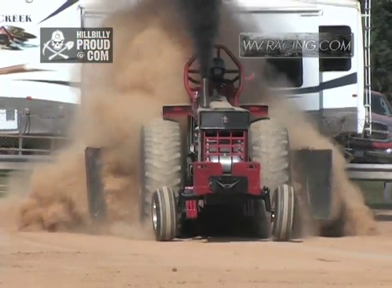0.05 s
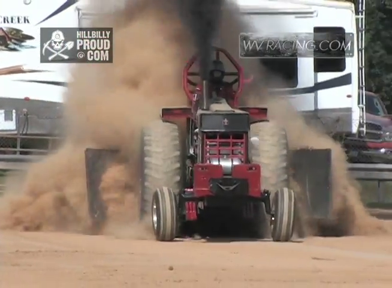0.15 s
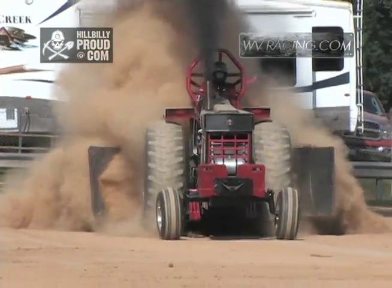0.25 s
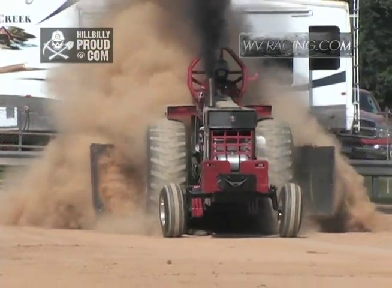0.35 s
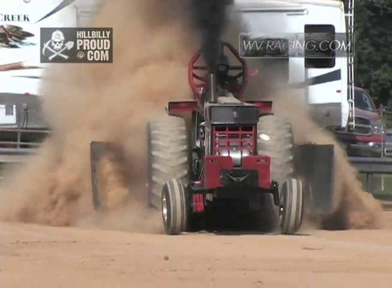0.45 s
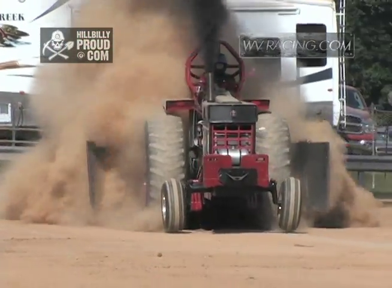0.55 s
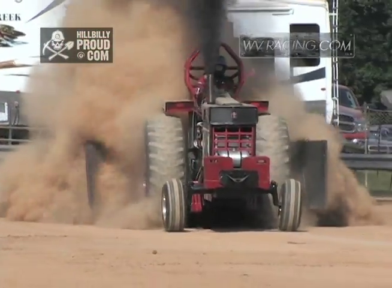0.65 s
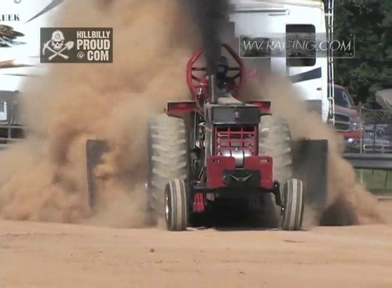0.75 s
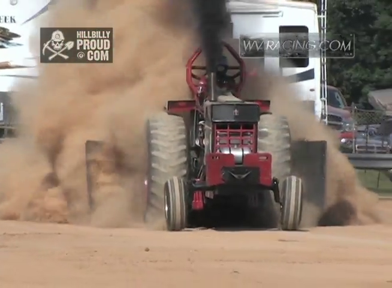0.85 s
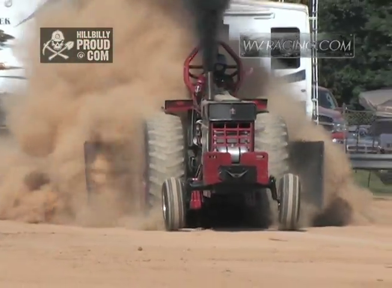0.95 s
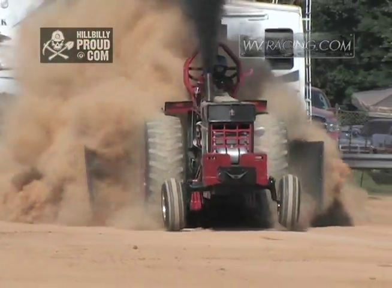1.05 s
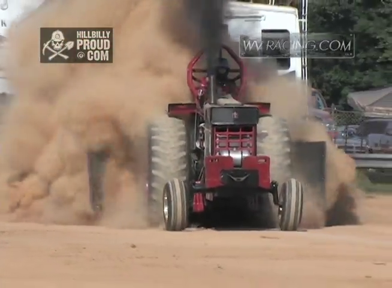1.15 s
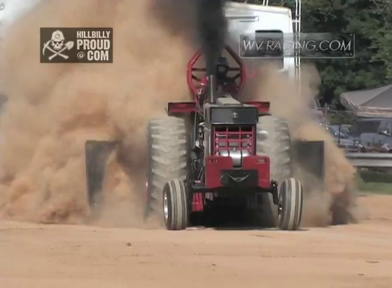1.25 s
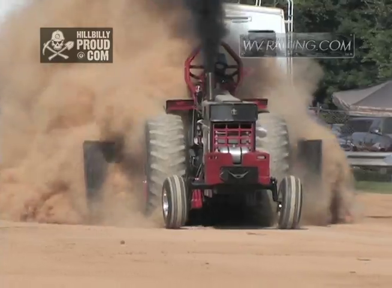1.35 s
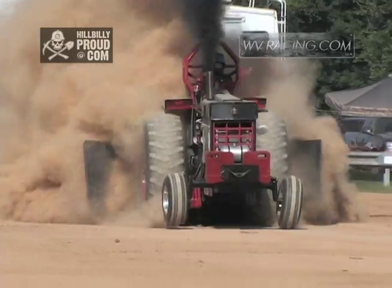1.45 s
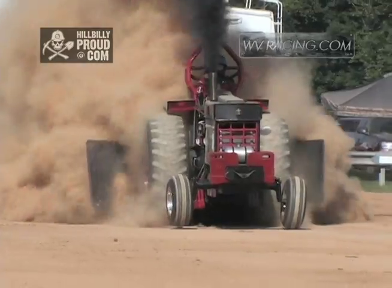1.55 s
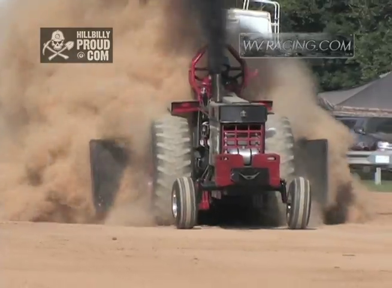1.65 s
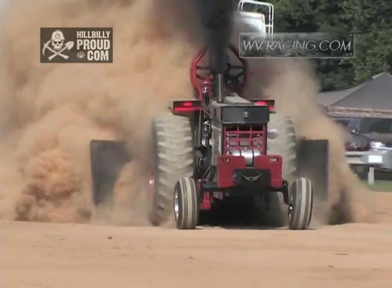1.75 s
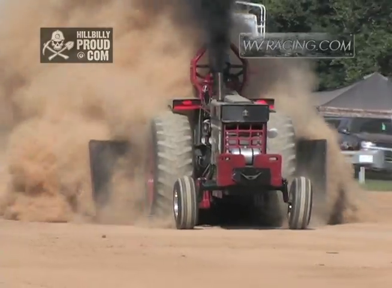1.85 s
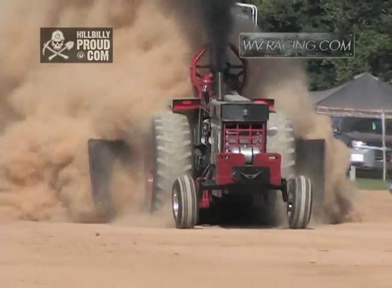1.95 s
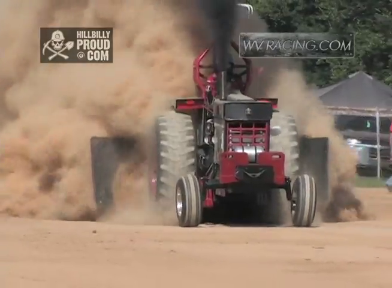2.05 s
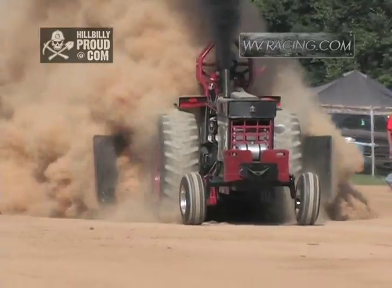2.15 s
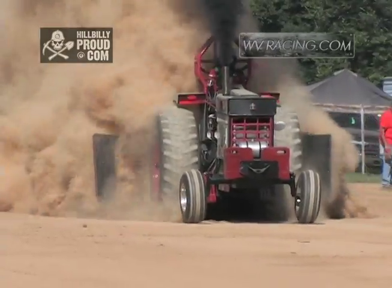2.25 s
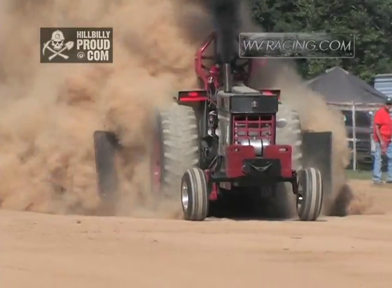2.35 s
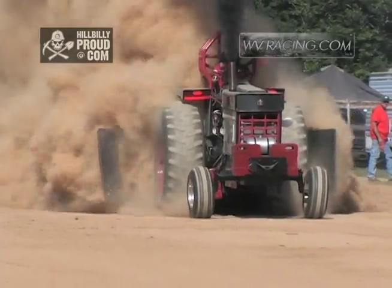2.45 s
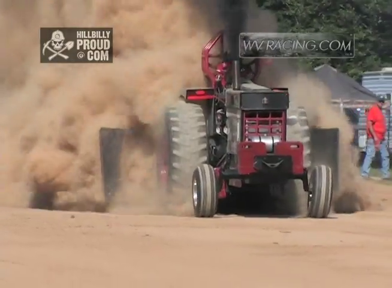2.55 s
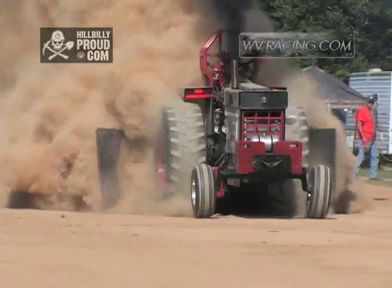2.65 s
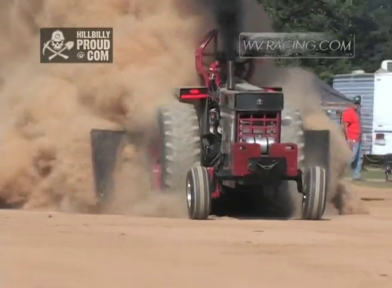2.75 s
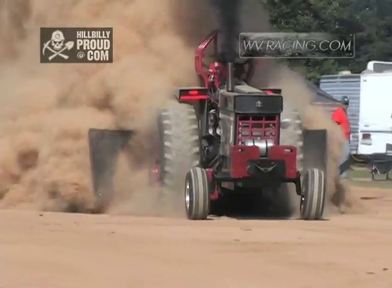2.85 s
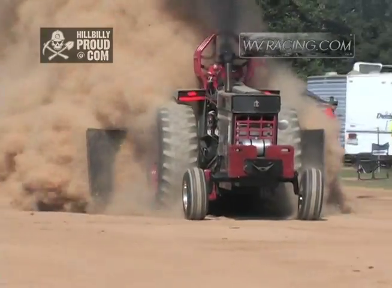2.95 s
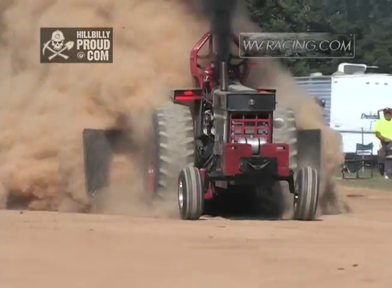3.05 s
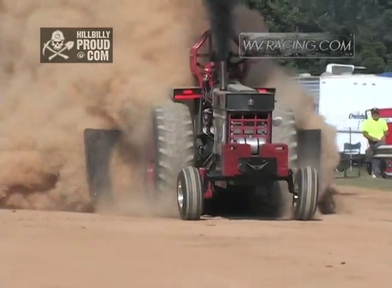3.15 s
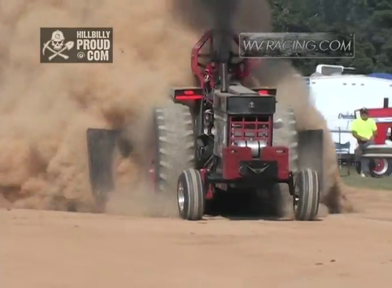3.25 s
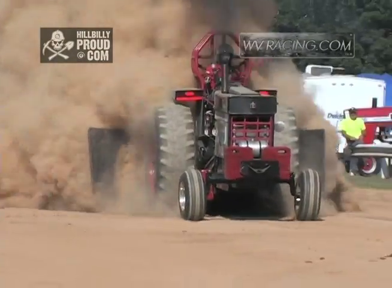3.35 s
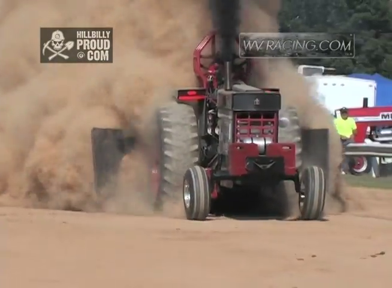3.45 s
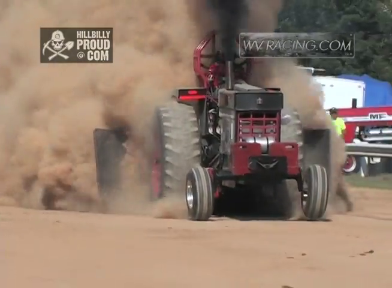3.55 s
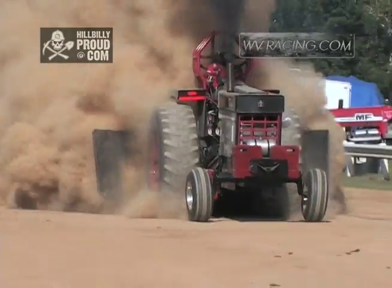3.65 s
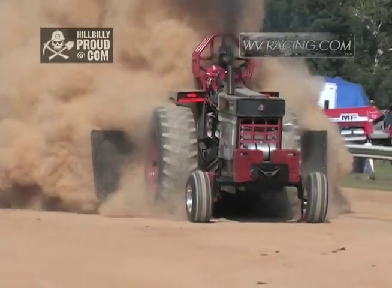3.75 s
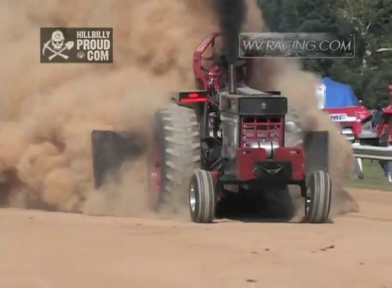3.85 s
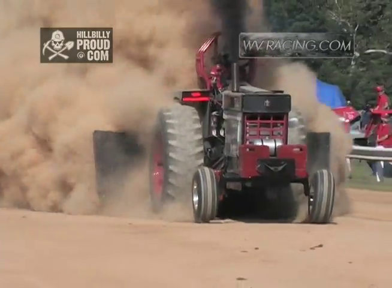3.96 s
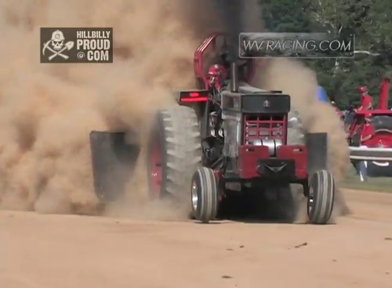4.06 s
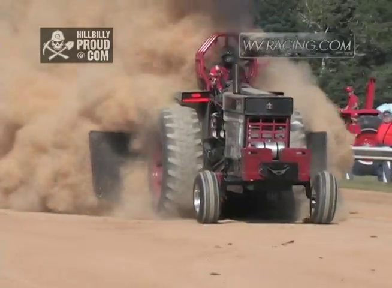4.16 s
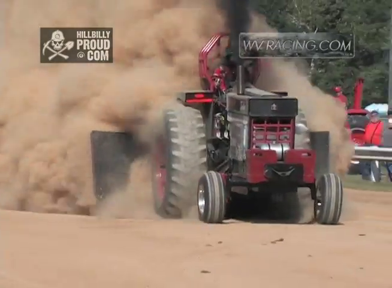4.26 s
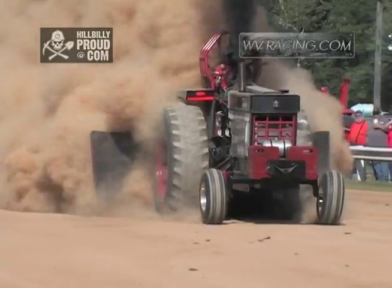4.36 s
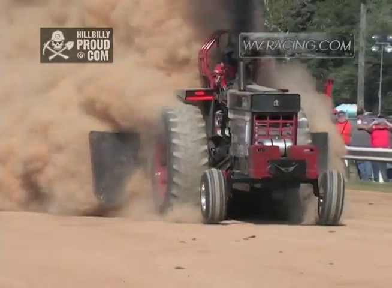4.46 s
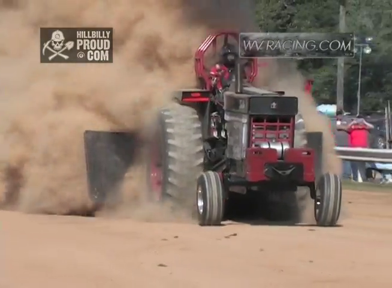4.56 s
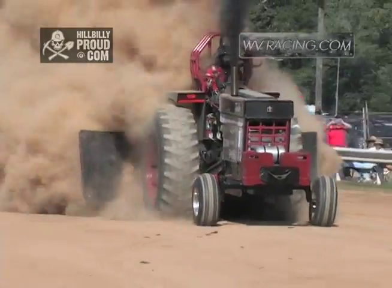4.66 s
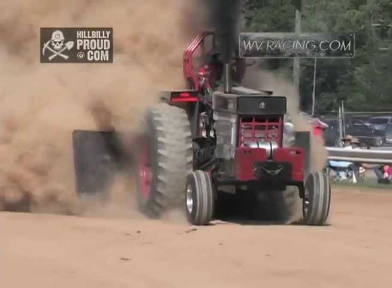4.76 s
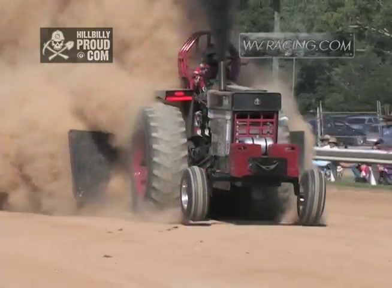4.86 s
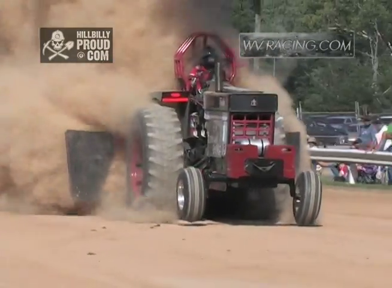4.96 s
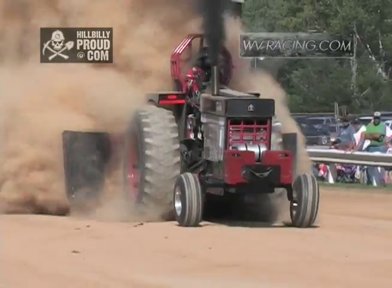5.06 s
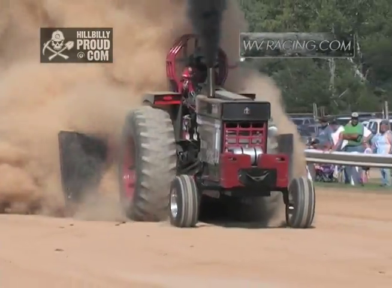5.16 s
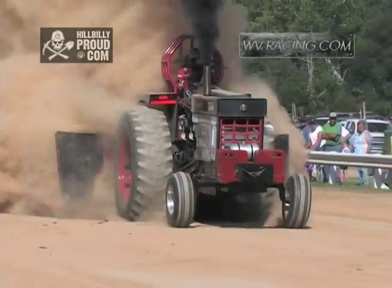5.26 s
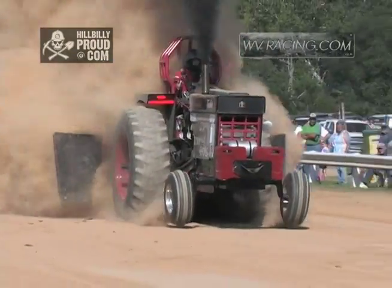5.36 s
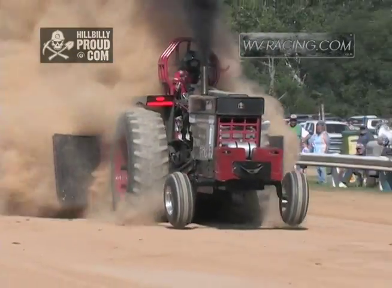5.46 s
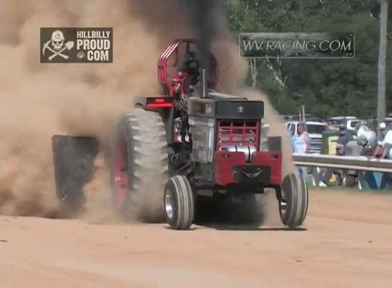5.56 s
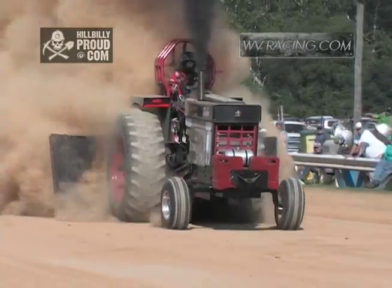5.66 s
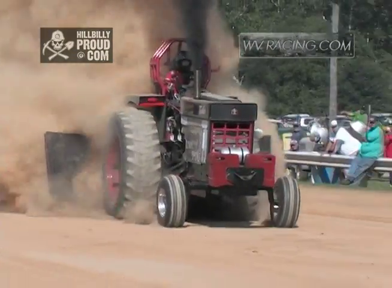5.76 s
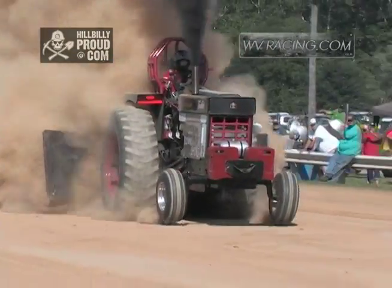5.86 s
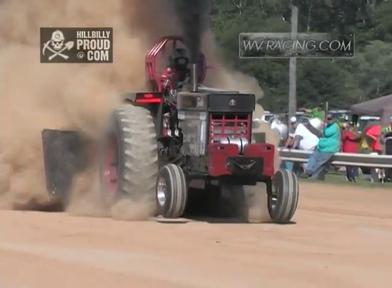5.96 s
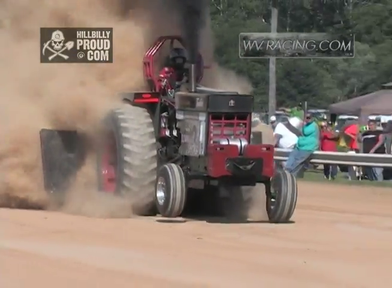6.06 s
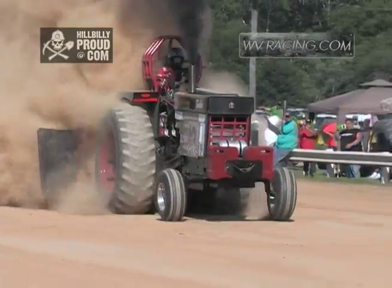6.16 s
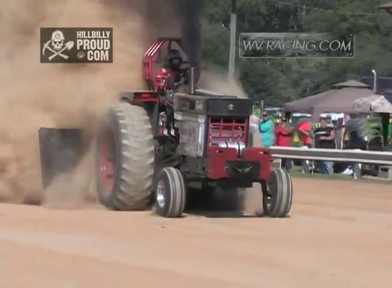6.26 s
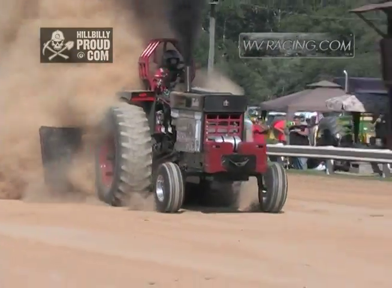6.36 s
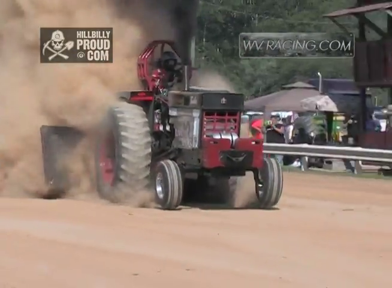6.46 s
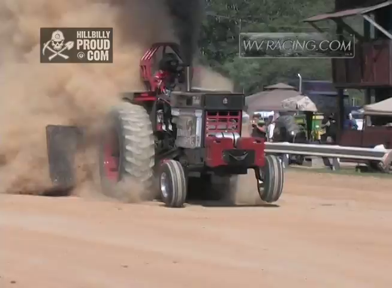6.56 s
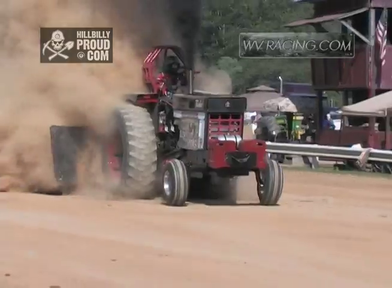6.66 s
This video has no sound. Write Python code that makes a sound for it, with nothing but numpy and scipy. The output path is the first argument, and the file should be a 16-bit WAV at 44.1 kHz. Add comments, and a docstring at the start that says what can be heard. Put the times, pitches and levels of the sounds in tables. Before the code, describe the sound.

A turbocharged diesel tractor is pulling at full throttle from the start, outdoors, heading toward the microphone. Its deep, booming drone carries a knocking rattle and a rushing exhaust hiss, with a faint rumble of sled and tyres underneath. For the first 3 seconds the revs swing up and down about twice a second, and a very high, thin turbo whistle wavers faintly with them. From about 3.1 to 5.2 seconds the engine falters briefly six times, roughly every 0.4 seconds. Each time the roar dips and the whistle drops in pitch, then both recover, mostly with a small rising chirp. The sound grows louder throughout as the tractor nears, with the hiss and whistle much stronger from around 4 seconds. After 5.3 seconds the revs hold steadier, and the engine roars at its loudest until the end at about 6.7 seconds.

```python
"""A boosted six-cylinder diesel tractor hauls a sled closer, in mono; its speed hunts and the fuel
cuts briefly six times. The stack booms a near-pure firing tone, gas roars out once a firing and
echoes off the track, and unequal cylinders knock in the block. The turbo's blades whistle near the
top of hearing and slow at each cut; a chirp marks the fuel's return. Sled and tyres rumble below."""
import sys
import numpy as np
from scipy import signal
from scipy.fft import rfft, irfft
from scipy.io import wavfile
from scipy.ndimage import uniform_filter1d, map_coordinates

SR = 44100
rng = np.random.default_rng(int(sys.argv[2]) if len(sys.argv) > 2 else 0)


def bounce(signal):
    """Save signal as a 16-bit WAV file at the path given by the first command-line argument."""
    frames = np.transpose(np.atleast_2d(signal))
    limited = np.clip(frames, -1, 1)
    pcm = np.round(limited * 32767).astype(np.int16)
    wavfile.write(sys.argv[1], SR, pcm)


N = 295911
T = np.arange(N) / SR
CRUISE_HZ = 140  # firing rate


def undb(db):
    return 10 ** (np.asarray(db) / 20)


def unit(x):
    return x / np.sqrt(np.mean(x ** 2))


def steady(x):
    """Hold the running RMS at 1, keeping the puffs."""
    return x / np.sqrt(uniform_filter1d(x ** 2, size=9000))


def curves(table):
    """Columns of a time table, one value a sample."""
    times_s, *columns = np.transpose(table)
    return [np.interp(T, times_s, column) for column in columns]


def colour(x, points):
    """Filter by (Hz, dB) points."""
    hz, db = np.transpose(points)
    log_hz = np.log(np.arange(N // 2 + 1) * SR / N + 1)
    return irfft(rfft(x) * undb(np.interp(log_hz, np.log(hz), db, left=-90, right=-90)), N)


def ring(x, hz, width_hz):
    """One resonance."""
    return signal.lfilter(*signal.iirpeak(hz, hz / width_hz, SR), x)


def walk(rate_hz):
    """Random steps, smoothed twice; RMS 1."""
    hold = int(SR / rate_hz)
    steps = np.repeat(rng.standard_normal(N // hold + 1), hold)
    return unit(uniform_filter1d(uniform_filter1d(steps, hold), hold)[:N])


# Turning points of engine speed. Each row: time in seconds, firing rate in Hz.
SPEED_HUNT = [(0.04, 145.6), (0.252, 117.7), (0.501, 146), (0.707, 124.2), (0.96, 145.8), (1.179, 122.6),
              (1.397, 146.3), (1.621, 122.5), (1.856, 143.7), (2.063, 127.1), (2.283, 143.1),
              (2.502, 130.4), (2.715, 143.2), (2.927, 131.5), (3.141, 148.8), (3.323, 134.9),
              (3.523, 149.5), (3.702, 135.6), (3.908, 148.9), (4.087, 137.7), (4.313, 147.8),
              (4.532, 137.4), (4.726, 151.6), (4.868, 138.8), (4.998, 139.9), (5.147, 153.1),
              (5.265, 135.7), (5.53, 143.0), (5.69, 141.9), (6.067, 138.1), (6.283, 142.1), (6.56, 133.5),
              (6.669, 136.2)]

def firing_hz(late_s=0):
    """The speed hunts, easing from one turning point to the next."""
    times_s, hz = np.transpose(SPEED_HUNT)
    rows = np.arange(len(times_s))
    position = np.interp(T - late_s, times_s, rows)
    eased = np.floor(position) + np.sin(np.pi / 2 * (position % 1)) ** 2
    return np.interp(eased, rows, hz)


# Fuel cuts. Each row: start in seconds, length in seconds, blade tone loss in Hz before respooling,
# boom dip in dB, roar dip in dB, knock dip in dB, chirp level in dB.
FUEL_CUTS = [(3.144, 0.13, 557, 3, 3.5, 0, -56), (3.511, 0.14, 1450, 5.5, 9, 7, -44),
             (3.887, 0.15, 1350, 7, 7, 6.5, -37), (4.286, 0.16, 1201, 4, 5, 4.5, -36.5),
             (4.707, .15, 1620, 8, 8, 10, -36), (5.137, 0.099, 1350, 12, 9.5, 7.5, -45)]

def fuel_cuts(depths, late_s=0, skew=1, power=2):
    """One smooth bump a cut, each with its own depth; skew above 1 peaks later."""
    bumps = np.zeros(N)
    for (start_s, length_s, *_), depth in zip(FUEL_CUTS, depths):
        progress = np.clip((T - start_s - late_s) / length_s, 0, 1)
        bumps += depth * np.abs(np.sin(np.pi * progress ** skew)) ** power
    return bumps


def blade_loss_hz(spool_s=0.1726):
    """The turbo slows while the fuel is cut, then spools up again."""
    _, length_s, loss_hz, *_ = np.transpose(FUEL_CUTS)
    return signal.lfilter([2 / SR], [1, -np.exp(-1 / (spool_s * SR))], fuel_cuts(loss_hz / length_s))


def puffs(firings, lag_firings, depth_db, cylinder_db, scatter_db):
    """Gain that swells once a firing, sized by cylinder and by chance."""
    firings = firings - lag_firings
    index = np.floor(firings).astype(int)
    size_db = cylinder_db[index % 6] + scatter_db * rng.standard_normal(N // 100)[index]
    return undb(uniform_filter1d(size_db, size=80) - depth_db * np.cos(2 * np.pi * firings))


# Rumble spectrum. Each row: frequency in Hz, relative density in dB.
RUMBLE_SPECTRUM = [(25, -27), (45, -16), (58, -8), (68, -1.5), (80, -12), (100, -3.5), (170, 3),
                   (250, -4.5), (350, -3.5), (480, -6)]

def ground_rumble(hum_hz=58.7):
    """Sled and tyres rumble over a wavering hum."""
    rumble = unit(colour(rng.standard_normal(N), RUMBLE_SPECTRUM))
    rumble *= undb(-39 + 0.21 * T + 2.1 * walk(4.812))
    hum = undb(-53 + 2.7 * walk(8.9)) * np.sin(2 * np.pi * hum_hz * T)
    return rumble + hum


def fuel_chirps(from_hz=3150, to_hz=3660, glide_s=0.068):
    """Narrow noise glides up as the fuel returns."""
    slow_noise = unit(colour(rng.standard_normal(N), [(1, -4), (120, 2), (260, -28)]))
    glides = np.zeros(N)
    for start_s, length_s, *_, db in FUEL_CUTS:
        progress = np.clip((T - start_s - 0.75 * length_s) / glide_s, 0, 1)
        hz = from_hz + (to_hz - from_hz) * progress
        envelope = undb(db) * 2 * np.sin(np.pi * progress ** 0.64)
        glides += envelope * np.sin(2 * np.pi * np.cumsum(hz) / SR)
    return glides * slow_noise


# Blade tone at cruise speed and full boost. Each row: time in seconds, frequency in Hz.
BLADE_PITCH = [(0, 12480), (.5, 12435), (1.5, 12500), (2, 12678), (2.5, 12754), (3, 12757), (3.6, 12595),
               (4.2, 12512), (4.8, 12533), (5.4, 12393), (5.7, 12587), (6, 12585), (6.33, 12750),
               (6.71, 12752)]
# Whistle at full boost. Each row: time in seconds, level in dB.
BLADE_LEVEL = [(0, -66), (.1, -60), (.28, -50), (.5, -59), (.7, -51), (.9, -59), (1.18, -49.5), (1.7, -54),
               (1.87, -62), (2.08, -53), (2.2, -59), (2.35, -51), (2.56, -61), (2.68, -42), (2.95, -43),
               (3.15, -43), (3.55, -47), (3.9, -40), (4.05, -43), (4.25, -32), (4.48, -44), (4.6, -36),
               (4.82, -37.5), (5, -39), (5.12, -34), (5.3, -35.5), (5.55, -45), (5.85, -30), (6.12, -39),
               (6.33, -35), (6.55, -43), (6.71, -37)]
# Neighbouring tones. Each row: frequency ratio to the blade tone, relative level in dB.
BLADE_SIDEBANDS = [(.9725, -16), (.9885, -18), (.995, -17), (1.005, -19), (1.0115, -19), (1.0275, -23)]

def turbo_whistle(loss_hz, lag_s=0.0144):
    """The blade tone and its neighbours follow engine speed and shimmer through hot air."""
    hz = curves(BLADE_PITCH)[0] + 13.6 * (firing_hz(lag_s) - CRUISE_HZ) - loss_hz
    db = curves(BLADE_LEVEL)[0] + 4.5 * loss_hz / 1000
    phase = 2 * np.pi * np.cumsum(hz + 9 * walk(120)) / SR
    tones = sum(undb(tone_db) * np.sin(ratio * phase) for ratio, tone_db in [(1, 0)] + BLADE_SIDEBANDS)
    shimmer_db = 2.16 * walk(60) + 0.98 * walk(150)
    return np.sqrt(2) * tones * undb(db + shimmer_db)


# Cylinders in firing order. Each row: signed knock size, knock lag in firings, rattle in dB, roar in dB.
CYLINDERS = [(0.48, .2, -1.6, 0.9), (-0.98, 0.194, 1.2, -0.1), (0.61, 0.453, 0.3, 0.46),
             (-0.57, 0.077, 0.4, -0.6), (-.4, 0.323, 1, 1.2), (0.61, 0.152, 0, 0.73)]
# Block modes. Each row: frequency in Hz, width in Hz, gain in dB.
BLOCK_MODES = [(216, 86, -2.5), (399, 83, 6), (550, 55, 13.5), (690, 45, -1), (775, 93, -18),
               (907, 240, -2.5), (1010, 90, -20)]

def cylinder_knock(firings):
    """Each cylinder strikes the block modes with its own force and timing."""
    size, lag_firings, _, _ = np.transpose(CYLINDERS)
    index = np.arange(int(firings[-1]) - 1)
    jitter, scatter = rng.standard_normal((N // 100, 2))[index].T
    strike_firings = index + np.clip(lag_firings[index % 6] + 0.0046 * jitter, 0, 1)
    strike_samples = np.interp(strike_firings, firings, np.arange(N)).astype(int)
    blows = np.bincount(strike_samples, size[index % 6] * undb(1.2 * scatter), N)
    return unit(sum(undb(db) * ring(ring(blows, hz, 2 * width_hz), hz, 2 * width_hz)
                    for hz, width_hz, db in BLOCK_MODES))


# Lines of the six-firing cycle. Each row: multiple of the cycle rate, relative level in dB.
CYCLE_ORDERS = [(3, -23), (7, -13), (8, -33), (9, -13), (10, -26), (11, -24), (12, -20.5), (13, -24),
                (14, -22.5), (15, -18.5), (16, -16), (17, -16), (18, -23), (19, -29), (20, -31),
                (21, -17.5), (22, -17), (23, -9), (24, -29), (25, -13.5), (26, -22), (27, -22), (28, -20.5),
                (29, -11), (30, -35), (31, -19), (32, -14.5), (33, -16.5), (35, -24), (36, -27), (38, -15),
                (41, -17.5)]

def cycle_lines(firings, panel_hz=668.8):
    """Harmonics gather into one thump a cycle, at the sixth firing; a panel lifts lines crossing it."""
    cycle_phase = 2 * np.pi * (firings - 5.3 + 0.0086 * walk(12)) / 6
    lines = np.zeros(N)
    for order, db in CYCLE_ORDERS:
        lag_rad = 0.05 * max(order - 19, 0) ** 2  # higher lines ring on later
        lines += undb(db + 2.3 * walk(5)) * np.sqrt(2) * np.cos(order * cycle_phase - lag_rad)
    return lines + undb(0.5) * ring(lines, panel_hz, width_hz=25)


# Rattle spectrum. Each row: frequency in Hz, relative density in dB.
RATTLE_SPECTRUM = [(100, -38), (170, -16), (184, -8.5), (303, -17), (445, -7), (675, -4.5), (1050, -10),
                   (1210, -21), (1300, -24.5), (1690, -52), (2860, -120)]

def engine_block(firings):
    """The block knocks and sings, and a looser rattle follows each firing."""
    knock = cylinder_knock(firings)
    lines = cycle_lines(firings)
    cylinder_db = np.transpose(CYLINDERS)[2]
    rattle = rng.standard_normal(N)
    rattle *= puffs(firings, lag_firings=0.13, depth_db=2.5, cylinder_db=cylinder_db, scatter_db=0.4)
    rattle = unit(colour(rattle, RATTLE_SPECTRUM))
    return undb(-11) * knock + undb(-3.2 + 0.8 * (T - 5)) * lines + undb(-3.6 - 0.3 * (T - 5)) * rattle


# Track reflection. Each row: time in seconds, first notch in Hz, strength from 0 to 1.
TRACK_ECHO = [(0, 9000, 0.65), (1.5, 8600, 0.06), (2.5, 7037, 0.4), (3.2, 6000, 0), (3.8, 5140, 0.9),
              (4.5, 4320, 0.66), (5.0, 4140, 0.76), (5.5, 3596, 0.31), (6.0, 3130, 0.39),
              (6.71, 2750, 0.33)]

def track_echo(gas):
    """An inverted echo off the track, later as the tractor nears."""
    notch_hz, strength = curves(TRACK_ECHO)
    reflected = colour(gas, [(2000, -15), (2900, -2.5), (20000, -10)])
    delayed = map_coordinates(reflected, [np.arange(N) - SR / notch_hz], order=3)
    return -np.clip(strength, 0, 1) * delayed


# Gas jet spectrum. Each row: frequency in Hz, relative density in dB.
ROAR_SPECTRUM = [(740, -43), (1250, -17.5), (1390, -7.5), (1750, -1), (2690, -9.5), (3250, -4), (4380, -3),
                 (5020, 0), (6460, -1), (7130, 0.5), (10800, -14), (14000, -36), (22000, -120)]
# The treble falls away sharply above 13 kHz. Each row: frequency in Hz, relative density in dB.
TREBLE_CUTOFF = [(11800, -17), (12800, -23), (13100, -46), (16000, -48)]

def gas_roar(firings, throat_db, edge_db, top_db):
    """Turbulent gas jets from the stack in puffs; moving air flutters each band on its own."""
    cylinder_db = np.transpose(CYLINDERS)[3]
    gas = rng.standard_normal(N)
    gas *= puffs(firings, lag_firings=0.32, depth_db=1.9, cylinder_db=cylinder_db, scatter_db=0.72)
    gas = colour(gas, ROAR_SPECTRUM + TREBLE_CUTOFF)
    gas = gas + track_echo(gas)
    throat = colour(gas, [(100, 0), (2500, 0), (2900, -30)])
    edge = colour(gas - throat, [(100, 0), (3800, 0), (4500, -30)])
    top = colour(gas, [(7500, -30), (8600, 0), (20000, 0)])
    middle = gas - throat - edge - top
    bands = [(middle, 0), (throat, throat_db), (edge, edge_db + 0.28), (top, top_db + 1.0)]
    return sum(steady(band) * undb(db + 1.08 * walk(9)) for band, db in bands)


def stack_boom(firings, pipe_hz=245.3):
    """The pipe passes the firing tone; its octave swells where low revs meet a pipe resonance."""
    phase = 2 * np.pi * (firings + 0.012 * walk(40))
    octave = undb(-12.5 - T) * ring(np.cos(2 * phase), pipe_hz, width_hz=26)
    return np.sqrt(2) * (np.sin(phase) + octave) * undb(0.86 * walk(30))


# Load as the tractor nears. Each row: time in seconds, boom in dB, boom sag in dB per Hz of lost speed,
# roar in dB, knock in dB, then the roar's throat, edge and top bands in dB over its middle.
ENGINE_LOAD = [(0, -25.5, 0.5, -37.5, -39, -10, -4.5, -12.5),
               (.5, -24.5, 0.44, -39, -37.5, -7.5, -5, -10.5), (1, -25, 0.57, -36, -37, -8, -8.5, -11.5),
               (1.4, -24.5, 0.21, -35.5, -36.5, -7.5, -4, -10.5),
               (1.8, -25.5, .2, -36.5, -36, -6, -3.5, -15), (2.2, -24.5, 0.37, -35, -35, -5.5, -5.5, -14.5),
               (2.6, -23.5, 0.41, -33, -35, -7.5, -7, -10), (3, -22, .3, -31.5, -33, -8, -6.5, -9),
               (3.4, -22, 0.51, -31, -33, -8.5, -5, -3), (3.8, -21, 0.28, -28, -31.5, -11.5, -9, -7.5),
               (4.2, -20, .3, -26.5, -31, -11.5, -8.5, -7.5),
               (4.6, -20, .2, -25.5, -29.5, -9.5, -10.5, -6.5),
               (5.05, -19, .2, -23.5, -27.5, -10.5, -11, -8), (5.33, -21, .5, -23, -28.5, -10, -10, -4.5),
               (5.45, -19, 0.52, -22, -27.5, -11, -13.5, -6), (5.8, -20, 0.54, -23, -27, -9, -13, -9),
               (6.2, -20, 0.48, -23.5, -26.5, -8, -11, -7.5), (6.71, -17, 0.49, -23, -25, -9, -10, -8)]
# Roar bands throat, edge, top. Each row: share of the swings escaped, share of the cut dips escaped.
BANDS_SPARED = [(0.69, 0.11), (0.78, 0.12), (0.27, 0.26)]

def engine(loss_hz):
    """Roar, boom and knock share the firings; their levels follow load, speed and fuel cuts."""
    boom_db, sag_db_per_hz, roar_db, knock_db, *bands_db = curves(ENGINE_LOAD)
    boom_dips_db, roar_dips_db, knock_dips_db = np.transpose(FUEL_CUTS)[3:6]
    firings = np.cumsum(firing_hz()) / SR
    snap_back = dict(skew=1.3, power=1.27)  # sink slowly, recover fast

    swing_db = 0.1833 * (firing_hz(late_s=-0.055) - CRUISE_HZ) - 3.5 * loss_hz / 1000
    dip_db = fuel_cuts(roar_dips_db, **snap_back)
    bands_db = [db - swing_share * swing_db + dip_share * dip_db
                for db, (swing_share, dip_share) in zip(bands_db, BANDS_SPARED)]
    roar = undb(roar_db + swing_db - dip_db) * gas_roar(firings, *bands_db)

    boom_db -= sag_db_per_hz * np.maximum(140.2 - firing_hz(late_s=0.0088), 0)
    boom_db -= fuel_cuts(boom_dips_db, late_s=0.012)
    knock_db += 0.0233 * (firing_hz() - CRUISE_HZ)
    knock_db -= fuel_cuts(knock_dips_db, **snap_back)
    return undb(boom_db) * stack_boom(firings) + undb(knock_db) * engine_block(firings) + roar


def scene():
    """Tractor and sled, the same in both channels."""
    loss_hz = blade_loss_hz()
    mono = engine(loss_hz) + turbo_whistle(loss_hz) + fuel_chirps() + ground_rumble()
    return np.tile(mono, (2, 1))


def record(dry):
    """Round the loudest peaks and low-pass at 15750 Hz."""
    rounded = np.tanh(1.103 * dry) / 1.107
    return signal.sosfilt(signal.ellip(10, 0.2, 70, 15750, fs=SR, output="sos"), rounded)


dry = scene()
out = record(dry)
bounce(out)
```